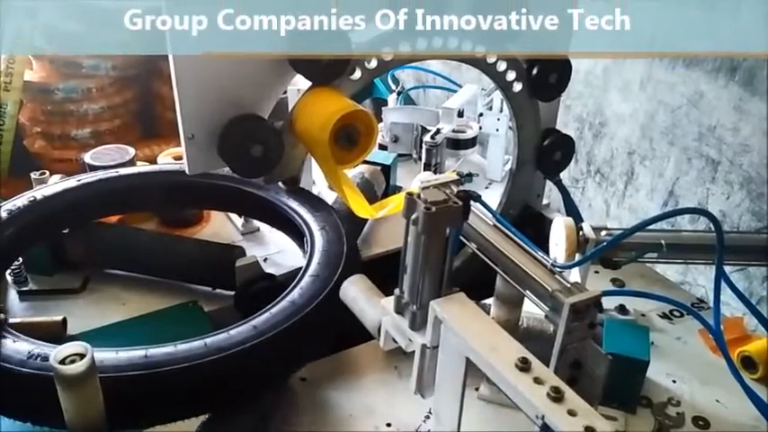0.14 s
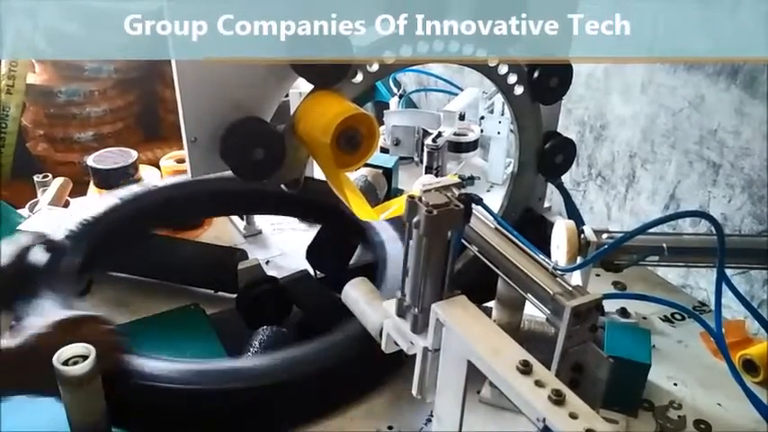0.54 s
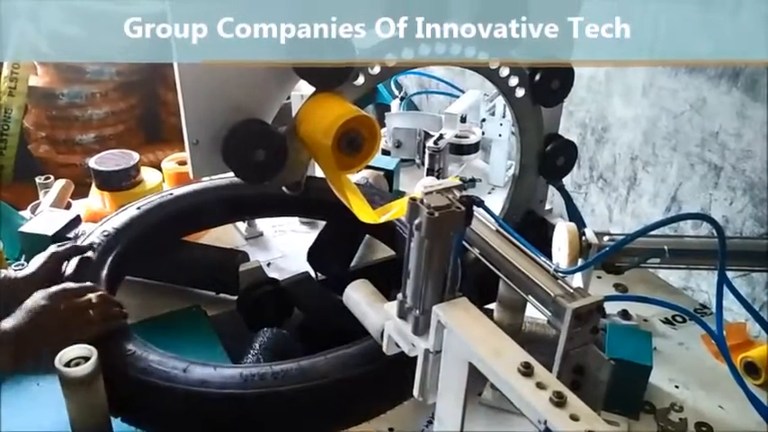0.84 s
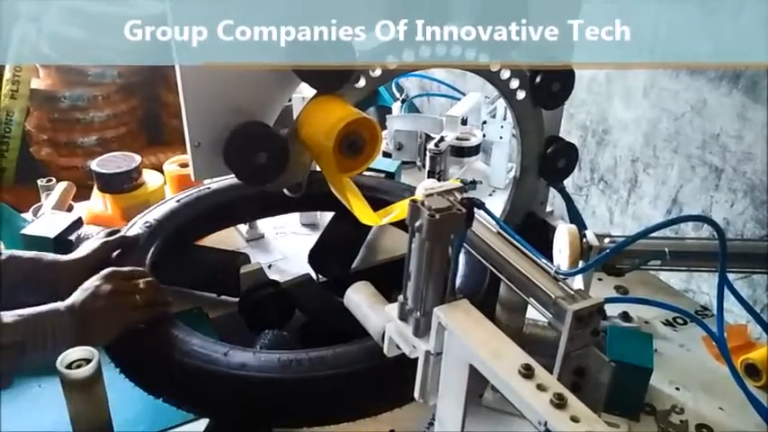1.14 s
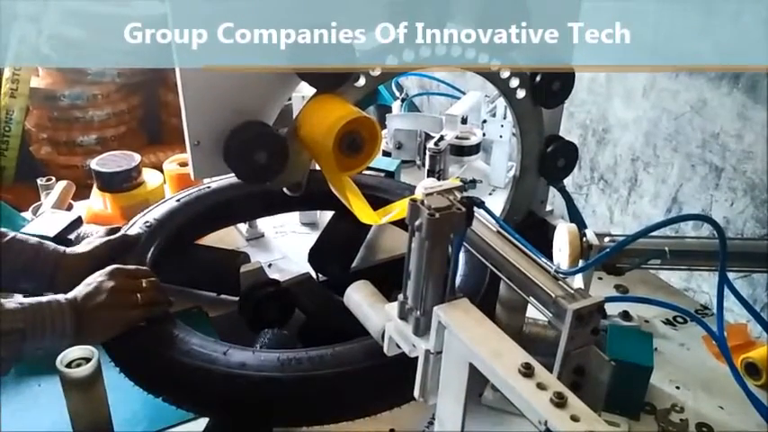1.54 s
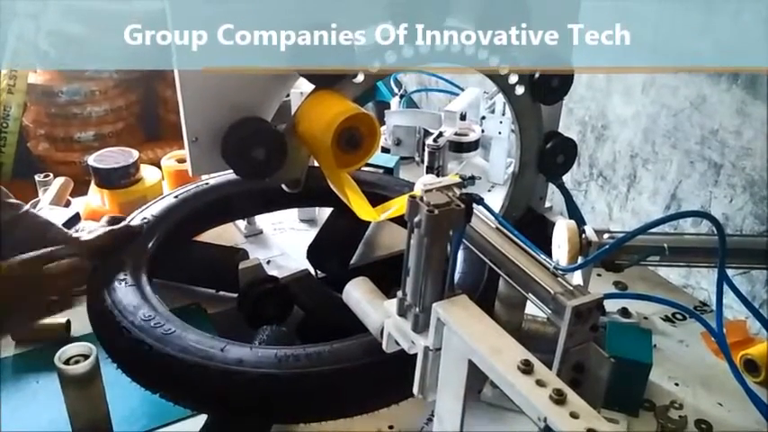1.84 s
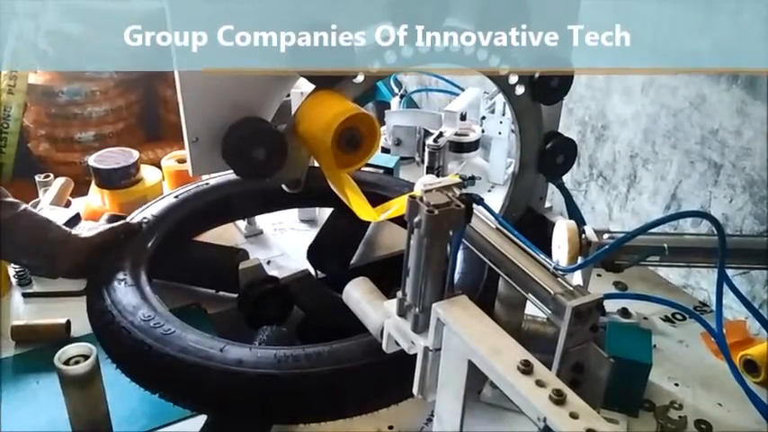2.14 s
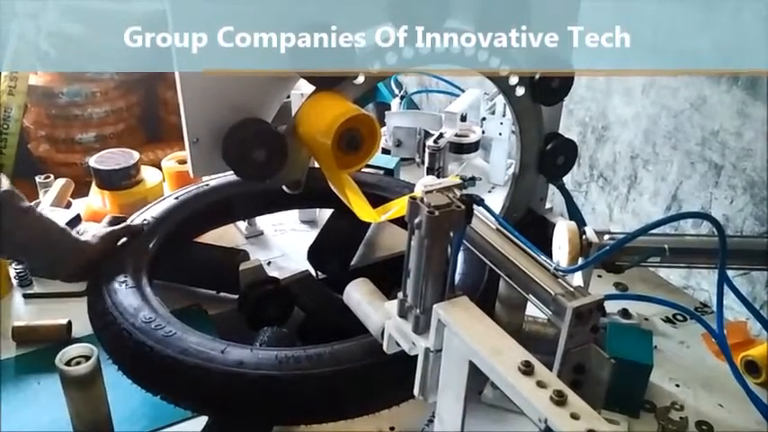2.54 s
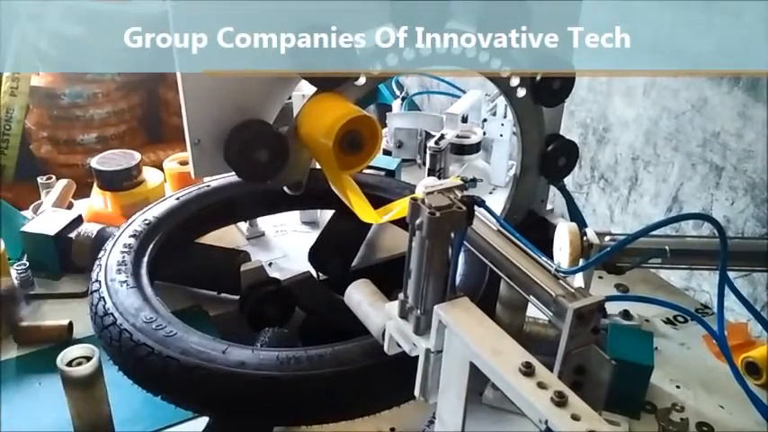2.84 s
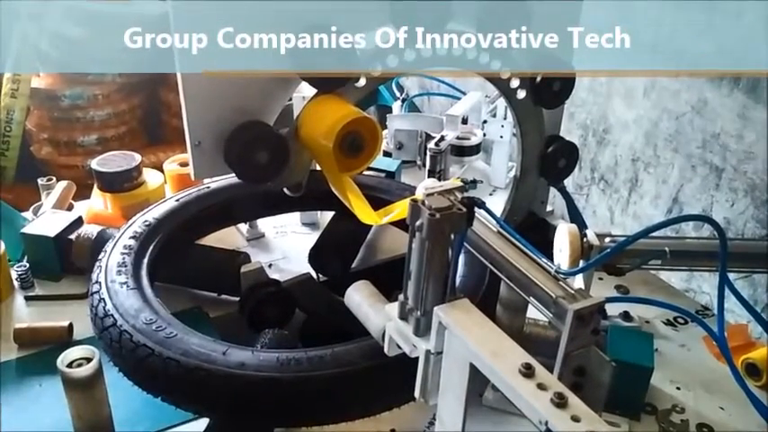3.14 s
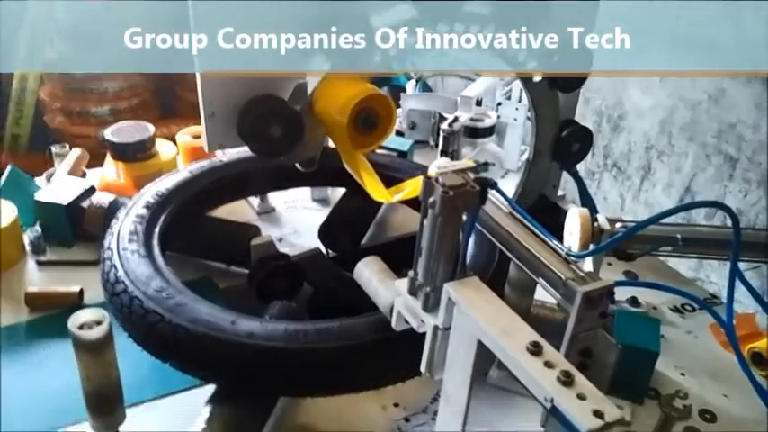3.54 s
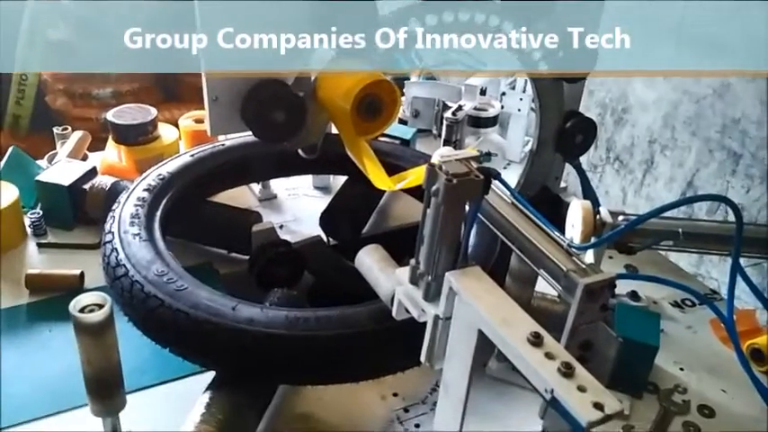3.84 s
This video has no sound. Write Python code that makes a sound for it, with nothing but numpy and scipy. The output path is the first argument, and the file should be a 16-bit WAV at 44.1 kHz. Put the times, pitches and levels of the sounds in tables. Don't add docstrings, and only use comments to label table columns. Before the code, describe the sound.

Two brief compressed air bursts stand out: one at 2.75 s, and a fuller one at 3.78 s after rapid metallic valve knocks. Earlier, film rustles and small clicks sound from the start, sharpest near 0.57 s; a tyre drags from 0.5 to 2.7 s with low rumble, scuffs and short groans. Clicks return around 3.25-3.5 s. Faint machine hum and leak continue; short workshop echo, treble leaning left.

```python
import sys
import numpy as np
from scipy import signal
from scipy.fft import rfft, irfft
from scipy.io import wavfile
from scipy.ndimage import uniform_filter1d

SR = 44100
rng = np.random.default_rng(int(sys.argv[2]) if len(sys.argv) > 2 else 0)


def rack_gain(trim_db):
    fader = np.asarray(trim_db, float)
    return 10 ** (fader / 20)


def to_wav(s):
    ch = np.atleast_2d(s).T
    pcm = np.round(np.clip(ch, -1, 1) * 32767)
    wavfile.write(sys.argv[1], SR, pcm.astype(np.int16))


N = 176400

# f/Hz, level per Hz/dB
JET = [(2500, -3.5), (3600, -20), (4400, 0.5), (5400, 0.5), (6800, 0), (8600, 7), (10400, -1.5), (14500, 2)]
# f/Hz, level per Hz/dB
BODY = [(90, -15), (500, -34), (800, -14), (1100, -7.5), (1600, -2), (2500, 3), (3200, 0), (4200, 2)]


def evened(x):
    return x / np.sqrt(np.mean(x ** 2) + 1e-20)


def drifting(x, bands, frames):
    x = uniform_filter1d(x, size=bands, axis=0)
    return evened(uniform_filter1d(x, size=frames, axis=1))


def read(points, hz):
    f, value = np.transpose(points)
    return np.interp(np.log(hz + 1), np.log(f + 1), value)


def paint(x, colour):
    hz = np.fft.rfftfreq(N, 1 / SR)
    edge = np.transpose(colour)[0]
    inside = (hz > edge[0]) * (hz < edge[-1])
    return evened(irfft(rfft(x) * rack_gain(read(colour, hz)) * inside, N))


def noise(colour, patchy_db=-1.0, flicker_db=0.5):
    # f/Hz, likeness [0-1]
    likeness = [(60, 0.89), (200, 1), (550, 0.78), (1300, 0.29), (4000, 0.14), (15000, 0.074)]
    frames, hz = N // 256 + 3, np.fft.rfftfreq(512, 1 / SR)
    a, b, c, d, patches = rng.standard_normal((frames, 257, 5)).T
    flicker = drifting(patches, 120, 2)
    patches = drifting(patches, 5, 12)
    same = np.clip(read(likeness, hz), -1, 1)[:, None]
    left = a + 1j * b
    right = same * left + np.sqrt(1 - same ** 2) * (c + 1j * d)
    z = np.array([left, right]) * rack_gain(patchy_db * patches + flicker_db * flicker)
    return paint(signal.istft(z, window="cosine", nperseg=512)[1][:, :N], colour)


def resonate(x, hz, width):
    r = np.exp(-np.pi * width / SR)
    return signal.lfilter([1 - r, 0, r - 1], [1, -2 * r * np.cos(2 * np.pi * hz / SR), r * r], x)


def air():
    # valve opens t/s, rise t/s, valve shuts t/s, jet level/dB, cylinder body level/dB
    bursts = [
        (2.74, 0.049, 2.798, -20.5, -31),
        (3.7815, 0.046, 3.87, -19.5, -25.5),
    ]
    turbulence_db, shut_s = 1.35, 0.037
    t, out = np.arange(N) / SR, np.zeros((2, N))
    jet, body = noise(JET, 1.5, turbulence_db), noise(BODY, 2.5, turbulence_db)
    for opens, rise, shuts, jet_db, body_db in bursts:
        # sound, level/dB, lag/s, level at the opening step/dB
        for sound, db, lag, start_db in ((jet, jet_db, 0, -11.5), (body, body_db, 0.012, -17.5)):
            u = t - opens
            swell = start_db * (1 - np.clip(u / (rise + lag), 0, 1)) ** 2
            swell = swell - 20 * np.maximum(t - shuts - lag, 0) / shut_s
            out += sound * rack_gain(db + np.maximum(swell, -150)) * np.clip(u / 0.0018, 0, 1)
    return out


def valve():
    # t/s, ring level/dB, puff level/dB, puff 60 dB decay t/s
    knocks = [
        (3.7507, -28, -30, 0.075),
        (3.756, -42, -41, 0.033),
        (3.7695, -24, -32, .06),
        (3.7745, -38, -35, .04),
        (3.7838, -17.5, -21.5, 0.038),
        (3.79, -18, -36, .02),
    ]
    # f/Hz, level/dB, 60 dB decay t/s
    spool = [(2930, -3, .016), (4100, -10, .012), (5300, -7, .018), (6950, -3, .018), (8300, -4, .015),
             (13600, -6, .02)]
    out, t = np.zeros((2, N)), np.arange(4000) / SR
    spurts = noise(JET, 1.2, 2.9)
    ring = sum(rack_gain(db - 60 * t / t60) * np.sin(2 * np.pi * hz * t) for hz, db, t60 in spool)
    for s, ring_db, puff_db, t60 in knocks:
        at = round(s * SR)
        puff = spurts[:, at:at + 4000] * rack_gain(puff_db - 60 * t / t60)
        out[:, at:at + 4000] += (rack_gain(ring_db) * ring + puff) * np.minimum(t / 0.00067, 1)
    return out


def clicks():
    # t/s, ring level/dB, ring f/Hz, puff level/dB, puff 60 dB decay t/s
    taps = [(.0735, -32, 7900, -35, 0.042), (.3775, -46, 8700, -59, .05), (0.571, -22, 10640, -50, 0.046),
            (.573, -22, 11400, -35.5, 0.047), (0.776, -31, 1900, -33, 0.0095), (.777, -39, 4680, -60, .01),
            (0.571, -40, 4560, -60, .01), (0.5732, -41, 1990, -60, .01), (0.7762, -40, 8700, -37, 0.0073),
            (0.818, -38, 9250, -35, 0.015), (0.829, -37, 4700, -46, .015), (1.135, -49, 2640, -61.5, .05),
            (1.694, -46, 2500, -50, 0.031), (2.029, -46, 8400, -43.5, 0.15),
            (3.2459, -31, 7940, -44, 0.073), (3.4065, -41, 2940, -38, 0.061),
            (3.4682, -29.5, 7200, -41, 0.056)]
    cycles, shortest_s = 1.3, .0003
    overtone, overtone_db = 1.2, -8
    out, t = np.zeros((2, N + 4000)), np.arange(4000) / SR
    puffs = noise(JET, 0.4, 2.0)
    for s, ring_db, hz, puff_db, t60 in taps:
        at, u = round(s * SR), t / (shortest_s + cycles / hz)
        ring = np.sin(2 * np.pi * hz * t)
        for k in (overtone, overtone ** -2):
            ring = ring + rack_gain(overtone_db) * k * k * np.sin(2 * np.pi * hz * k * t)
        hiss = puffs[:, at - 2000:at + 2000] * rack_gain(puff_db - 60 * t / t60) * np.minimum(u, 1)
        out[:, at:at + 4000] += rack_gain(ring_db) * u * np.exp(1 - u) * ring + hiss
    return out[:, :N]


def rumble():
    # t/s, level/dB
    drag = [(0, -52.5), (.15, -57.5), (.43, -66.5), (.5, -52.5), (.65, -49.5), (.95, -48), (1.08, -56.5),
            (1.2, -50.5), (1.55, -51), (1.75, -54.5), (2.0, -49), (2.3, -51.5), (2.7, -54.5), (2.9, -56.5),
            (3.45, -66), (3.55, -63), (3.75, -57), (4, -50.5)]
    # f/Hz, level per Hz/dB
    rumble_colour = [(20, -16.5), (120, -7), (240, 4.5), (600, -1.5), (910, -1.5), (1300, -8.5),
                     (2200, -10), (3600, -21)]
    s, db = np.transpose(drag)
    strength = rack_gain(np.interp(np.arange(N) / SR, s, db, -120, -120))
    return strength * noise(rumble_colour, 2.9, 1.6)


def scuffs():
    # start t/s, length t/s, level/dB, f/Hz, width f/Hz
    slips = [(0.48, 0.046, -51.5, 2500, 250), (0.51, 0.028, -50.5, 1440, 190),
             (0.55, 0.015, -41.5, 380, 250), (0.69, 0.21, -48, 2030, 390), (0.826, 0.033, -43.5, 1060, 130),
             (1.121, 0.069, -48, 2500, 770), (1.127, 0.041, -48, 1440, 690), (0.637, 0.19, -53.5, 98, 63),
             (0.596, 0.36, -51.5, 280, 220), (1.6, 0.036, -39.5, 563, 180), (1.661, 0.16, -43.5, 2500, 320),
             (1.72, 0.089, -54, 3200, 440), (1.583, 0.066, -52.5, 2440, 700),
             (1.203, 0.095, -54, 2200, 120), (1.69, 0.077, -47.5, 11900, 1700),
             (1.932, 0.17, -46, 790, 150), (2.262, 0.09, -47, 370, 150), (1.734, 0.21, -51.5, 827, 104),
             (2.737, 0.13, -42.5, 816, 170), (2.786, 0.086, -46, 375, 180), (2.75, 0.044, -36.5, 2470, 400),
             (2.745, 0.067, -40, 1010, 160), (3.4, 0.048, -49.5, 1800, 1900),
             (3.785, 0.032, -30, 2530, 1100), (1.52, 0.12, -56, 4960, 120), (4.8, .06, -57.5, 1100, 800),
             (3.664, 0.085, -51.5, 232, 43), (3.792, 0.031, -47.5, 117, 30), (3.797, 0.19, -48.5, 420, 56)]
    out, white = np.zeros((2, N)), noise([(40, 0), (14000, 0)], 2.7, 0.43)
    for s, length, db, hz, width in slips:
        at, size = round(s * SR), round(length * 2 * SR)
        sound = white[:, max(at - 6000, 0):at + size]
        sound = resonate(resonate(sound, hz, width), hz, width)[:, 6000:]
        u = np.arange(sound.shape[1]) / SR / length
        shape = np.minimum(u / 0.33, 1) * rack_gain(-11.5 * u ** 2)
        out[:, at:at + size] += rack_gain(db) * shape * evened(sound)
    return out


def squeals():
    # start t/s, length t/s, level/dB, first f/Hz, last f/Hz
    tones = [
        (2.495, .16, -61, 2895, 2882),
        (2.035, .06, -39, 333, 327),
        (2.14, .035, -42, 337, 331),
        (1.7, .11, -54, 2560, 2490),
        (2.48, .05, -60, 2200, 2185),
        (2.39, .08, -49, 500, 470),
        (1.585, .03, -45, 225, 250),
    ]
    waver, wobble_db = .004, 1.2
    out = np.zeros(N)
    drift = uniform_filter1d(rng.standard_normal((2, N)), size=500)
    drift = evened(uniform_filter1d(drift, size=500))
    for s, length, db, first_hz, last_hz in tones:
        at, u = round(s * SR), np.arange(round(1.4 * length * SR)) / SR / length
        pitch, wobble = drift[:, at:at + len(u)]
        hz = (first_hz + (last_hz - first_hz) * u) * (1 + waver * pitch)
        shape = np.clip(np.minimum(u / .25, (1.4 - u) / .5), 0, 1)
        tone = np.sin(2 * np.pi * np.cumsum(hz) / SR)
        out[at:at + len(u)] += rack_gain(db + 1.5 + wobble_db * wobble) * shape * tone
    return out


def film():
    # start t/s, length t/s, level/dB, share near the open port [0-1]
    strokes = [(-.04, 0.087, -42, .9), (0.059, 0.11, -39, .8), (0.371, 0.045, -50.5, 1.0),
               (0.43, 0.21, -44.5, 1.1), (0.581, 0.15, -42.5, 1.1), (0.8, 0.054, -50, 1.1),
               (1.117, 0.085, -50, 1.1), (1.203, 0.073, -50, .9), (1.38, 0.27, -59, 0),
               (1.69, 0.11, -53, 1.1), (1.861, 0.25, -46.5, .9), (2.308, 0.32, -49, .5),
               (2.592, 0.37, -44, .9), (3.391, 0.14, -46.5, 0.9)]
    # f/Hz, level per Hz/dB
    rustle_colour = [(1500, -43), (2500, -10), (4300, -9.5), (6300, -4), (8400, 8.5), (10200, -1),
                     (13000, 4.5), (14500, -11)]
    t, rustle = np.arange(N) / SR, noise(rustle_colour, 1.5, 1.8)
    near, far = np.zeros(N), np.zeros(N)
    for s, length, db, share in strokes:
        u = np.maximum(t - s, 0) / length
        shape = np.minimum(u / 0.3, 1) * rack_gain(db - 4.5 * np.minimum(u, 4) ** 2)
        near += np.clip(share, 0, 1) * shape
        far += np.clip(1 - share, 0, 1) * shape
    dull = noise(BODY[4:] + [(7000, 0.0), (14000, -13)])
    return ports(near * rustle, 1.34, lag=0) + ports(far * dull, 0.47)


def machine():
    # f/Hz, level per Hz/dB
    hum = [(20, -8), (60, -7), (120, -8.5), (240, -2), (500, -3.5), (950, -9), (1200, -32), (2000, -48)]
    leak = [(1000, -5.5), (1900, -2), (2530, -1.5), (4000, -5), (6500, -4.5), (8600, 1.5), (10400, -4),
            (14500, -3.5)]
    # f/Hz, width f/Hz, level/dB
    motor_bands = [(800, 49, -65), (864.7, 57, -63.5), (99, 8, -75), (2960, 12, -78)]
    white = noise([(20, 0), (4000, 0)], 0.63, 0.99)
    motor = sum(rack_gain(db) * evened(resonate(resonate(white, f, w), f, w)) for f, w, db in motor_bands)
    return rack_gain(-62.5) * noise(hum, 0.73, 0.87) + motor + rack_gain(-55.5) * noise(leak, 1.0, 0.51)


def shop(x):
    # f/Hz, 60 dB decay t/s
    decay = [(500, 0.17), (1500, 0.56), (4000, 0.49), (12000, 0.27)]
    hz, t, z = signal.stft(x[0], SR, nperseg=256, noverlap=192)
    power = uniform_filter1d(abs(z) ** 2, size=5, axis=0)
    lingers = rack_gain(-120 * 64 / SR / read(decay, hz))
    tail = np.array([signal.lfilter([0, 1 - k], [1, -k], p) for k, p in zip(lingers, power)])
    a, b = rng.standard_normal((2, 2) + z.shape)
    z = np.sqrt(abs(tail)) * (a + 1j * b)
    return signal.istft(z, SR, nperseg=256, noverlap=192)[1][:, :N]


def notched(x):
    # f/Hz, width f/Hz, level/dB
    notches = [(3620, 60, -11), (4480, 50, -15), (4760, 60, -17)]
    f = np.fft.rfftfreq(N, 1 / SR)
    dips = sum(db * np.exp(-((f - hz) / width) ** 2) for hz, width, db in notches)
    return irfft(rfft(x) * rack_gain(dips), N)


def ports(x, lean, lag=1):
    # f/Hz, left minus right level/dB
    tilt = [(300, 1.5), (700, -2), (1400, 5), (3500, 4.5), (6000, 7.5), (8600, 22), (10400, 18.5),
            (14000, 19)]
    # f/Hz, left minus right phase [radians]
    port_phase = [(900, 0), (1640, -2.5), (3270, -6.5), (6300, -15), (14000, -33)]
    hz = np.fft.rfftfreq(N, 1 / SR)
    db, turned = lean * read(tilt, hz) / 2, np.exp(.5j * lag * read(port_phase, hz))
    gain = rack_gain(np.array([db, -db]))
    gain = gain * np.sqrt(4 / (gain ** 2).sum(0))
    return irfft(rfft(x) * gain * np.array([turned, 1 / turned]), N)


def scene():
    hiss, knocks = air(), clicks() + valve()
    tyre = rumble() + scuffs() + squeals()
    echo = rack_gain(2) * ports(shop(hiss + .5 * knocks), 0.83)
    return notched(ports(hiss + knocks, 1.0) + echo) + film() + ports(tyre + machine(), 0.77)


def top_cut(x):
    return signal.sosfilt(signal.butter(12, 15540, fs=SR, output="sos"), x)


def record(dry):
    mix = dry / (1 + abs(1.15 * dry) ** 4) ** .25
    return top_cut(mix)


dry = scene()
out = record(dry)
to_wav(out)
```